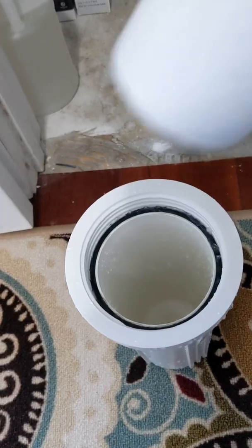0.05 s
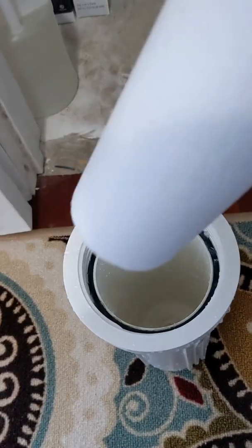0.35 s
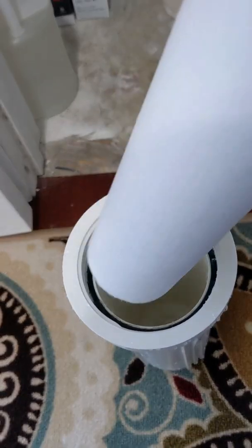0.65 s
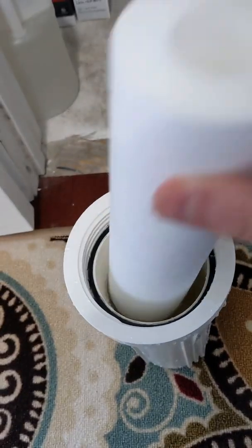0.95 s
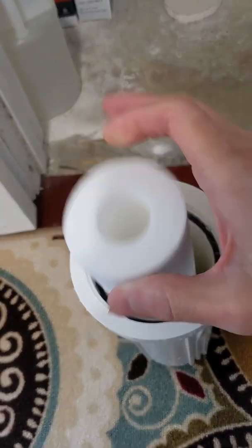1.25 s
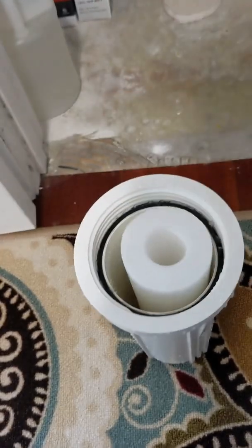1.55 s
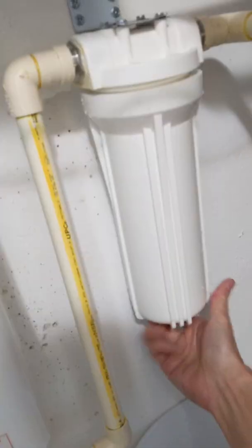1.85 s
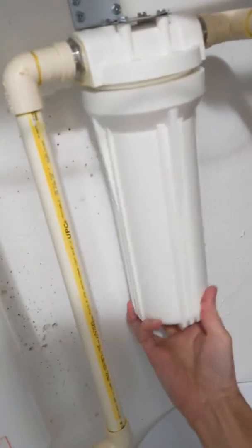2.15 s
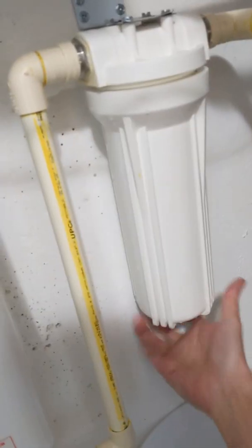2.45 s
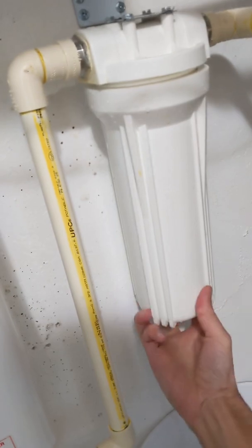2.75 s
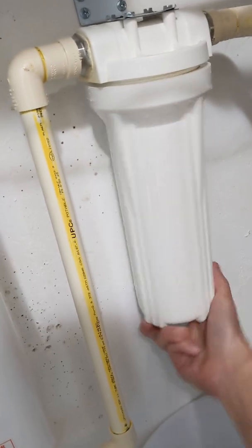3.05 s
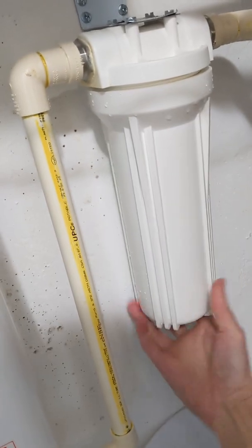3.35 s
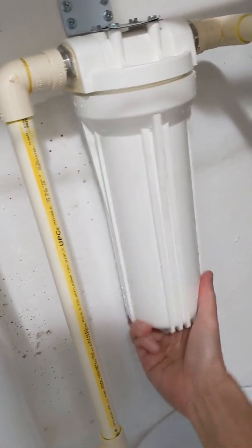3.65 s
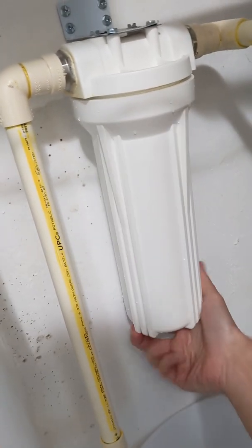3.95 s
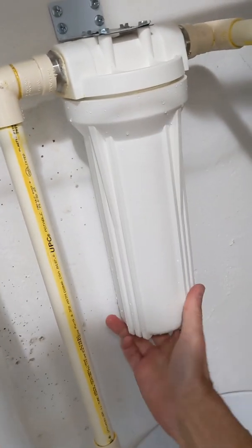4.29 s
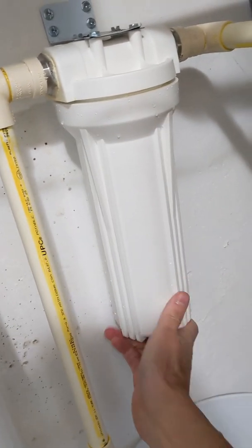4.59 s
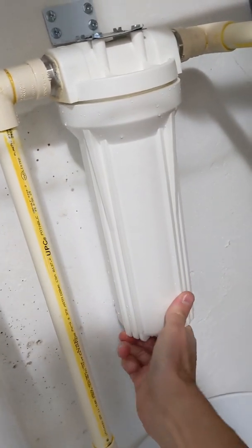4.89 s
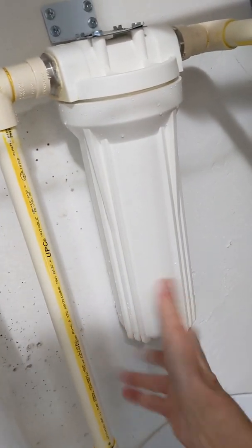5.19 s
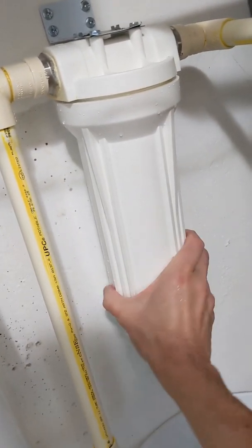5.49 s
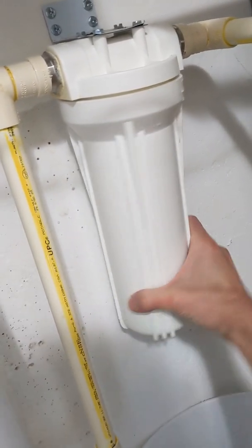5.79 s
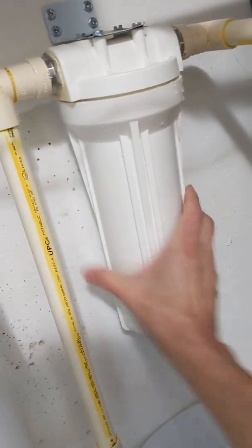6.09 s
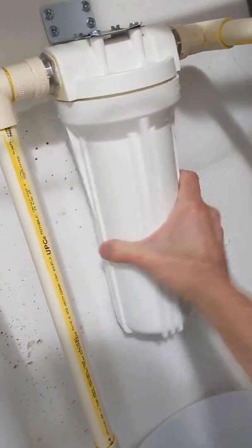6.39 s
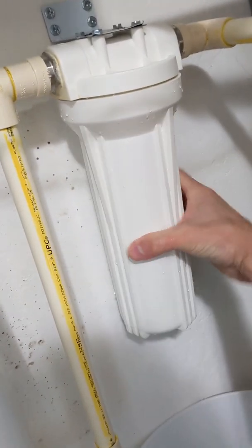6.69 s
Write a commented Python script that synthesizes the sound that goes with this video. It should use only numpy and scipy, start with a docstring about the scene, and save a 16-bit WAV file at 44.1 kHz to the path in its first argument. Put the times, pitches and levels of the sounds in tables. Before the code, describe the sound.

A loud, bouncing hollow thud, then uneven plastic knocks, dull pipe thumps and thread scraping as a filter housing is hand-tightened indoors.

```python
"""A plastic filter housing is screwed onto its head by hand in a small, hard-walled room. Its loose sump
knocks in the threads, ringing the shell and shaking the pipework; the threads scrape and squeak, and
the palm slides to a new grip. In a short scene before it, the cartridge grazes the rim, drops in and
bounces on the bottom with a loud, hollow boom. Mains hum lies under both scenes."""
import sys
import numpy as np
from scipy import signal
from scipy.fft import rfft, irfft, next_fast_len
from scipy.io import wavfile
from scipy.ndimage import uniform_filter1d

SR = 44100
rng = np.random.default_rng(int(sys.argv[2]) if len(sys.argv) > 2 else 0)


def to_wav(sig):
    """Store sig (one row per channel, or 1-D mono) as 16-bit WAV at the path in sys.argv[1].

    Samples outside -1..1 are clipped; the rate is SR.
    """
    pcm = np.clip(np.atleast_2d(sig), -1, 1) * 32767
    pcm = np.round(pcm).astype(np.int16)
    wavfile.write(sys.argv[1], SR, pcm.T)  # frames by channels


N = 296779
TIME = np.arange(N) / SR
RING_TIME = np.arange(SR) / SR  # one second for a hit to ring out
TOP_HZ = 16050
GRIP_S, LET_GO_S = 0.017, 0.022  # attack and release of a twist

# twists of the wrist: start/s, peak/s, end/s, effort slope/(dB/s), scrape/dB, hiss/dB, rumble/dB
TWISTS = [(1.783, 1.798, 1.926, 220.5, -39.5, -63, -42), (2.111, 2.243, 2.434, 127.5, -36, -56, -34),
          (2.792, 2.85, 2.96, 129.5, -47.5, -69, -43), (2.903, 3.053, 3.067, 63, -38.5, -53.5, -35),
          (3.524, 3.768, 3.89, 54.5, -37, -59.5, -20.5), (5.546, 5.743, 5.84, 4, -50.5, -79, -53),
          (6.353, 6.393, 6.62, 14.5, -44, -75, -24.5)]


def amp(db):
    """Decibels to gain."""
    return 10 ** (np.asarray(db) / 20)


def unit(x):
    """Scale to rms 1."""
    return x / np.sqrt(np.mean(x ** 2))


def unit_attack(x):
    """Scale a hit so that its first 30 ms have rms 1."""
    return x / np.sqrt(np.mean(x[..., :int(.03 * SR)] ** 2))


def curve(points, hz):
    """Value of an (f/Hz, value) table on a log-frequency axis."""
    f, value = np.transpose(points)
    return np.interp(np.log(hz + 1), np.log(f), value)


def eq(x, gain):
    """Filter by a gain that is a function of frequency."""
    size = next_fast_len(x.shape[-1] + SR // 8)
    return irfft(rfft(x, size) * gain(np.fft.rfftfreq(size, 1 / SR)), size)[..., :x.shape[-1]]


def colour(x, points):
    """Apply an (f/Hz, level/dB) EQ curve and scale to rms 1."""
    return unit(eq(x, lambda f: amp(curve(points, f))))


def cut(x, hz, kind):
    """Second-order low-pass or high-pass."""
    return signal.sosfilt(signal.butter(2, min(hz, TOP_HZ), kind, fs=SR, output="sos"), x)


def resonate(x, hz, q):
    """One resonant band, with Q held at 1 or more."""
    return signal.lfilter(*signal.iirpeak(min(hz, 15000), max(q, 1), SR), x)


def spread(pair, split_hz=850):
    """Two unrelated signals become one stereo field: centred bass, wide treble."""
    side = eq(pair[1], lambda f: f / np.hypot(f, split_hz))
    return np.array([pair[0] + side, pair[0] - side]) / np.sqrt(2)


def noise(size):
    """Diffuse stereo noise."""
    return spread(rng.standard_normal((2, size)))


def decay(t60):
    """Envelope that falls 60 dB in t60 seconds."""
    return np.exp(-np.log(1000) * RING_TIME / t60)


def ring(modes, scatter_db=0, detune=0, stagger=np.pi):
    """Damped modes, staggered in phase; scatter and detune stand for where the blow lands."""
    out = 0
    for k, (hz, db, t60) in enumerate(modes):
        level_draw, pitch_draw = rng.standard_normal(2)
        phase = 2 * np.pi * hz * (1 + detune * pitch_draw) * RING_TIME - k * stagger
        out = out + amp(db + scatter_db * level_draw) * decay(t60) * np.sin(phase)
    return out


def burst(spectrum, t60, top_hz):
    """Crowded modes of a struck wall: decaying noise, dulled above top_hz by the contact."""
    return unit_attack(cut(colour(noise(SR), spectrum) * decay(t60), top_hz, "low"))


def friction(spectrum, grain_db, patchy_db, catches_hz=90):
    """Dense micro-slips of uneven size that bunch up as the surfaces catch."""
    slips = rng.standard_normal((2, N)) * amp(grain_db * rng.standard_normal(N))
    catching = unit(eq(rng.standard_normal(N), lambda f: np.exp(-(f / catches_hz) ** 2)))
    return colour(spread(slips * amp(patchy_db * catching)), spectrum)


def add(out, t, sound):
    """Mix a sound in at t seconds."""
    i = int(t * SR)
    out[:, i:i + sound.shape[-1]] += sound[..., :N - i]


def swells(rows):
    """Smooth rises and falls of gain from rows of centre/s, length/s, level/dB."""
    gain = np.zeros((1, N))
    for t, length, db in rows:
        add(gain, t - length / 2, amp(db) * np.hanning(int(length * SR)))
    return gain


def effort(twist, release_s):
    """Effort of one twist, 0-1: it grips, builds to its peak, eases at the same rate and lets go."""
    start, peak, end, slope_db_per_s = twist[:4]
    grip = np.clip((TIME - start) / GRIP_S, 0, 1)
    release = np.exp(-np.maximum(TIME - end, 0) / release_s)
    return grip * release * amp(-slope_db_per_s * abs(np.minimum(TIME, end) - peak))


def room(x, wet_db, build_s=0.0045):
    """Add the tail of a small hard room; each octave dies at its own rate."""
    # reverb time: f/Hz, t60/s
    reverb_times = [(80, 0.87), (250, 0.48), (600, 0.45), (1500, 0.25), (4000, 0.39), (12000, 0.25)]
    field, tail = noise(SR), 0
    for hz in 62.5 * 2. ** np.arange(9):
        octave = eq(field, lambda f: np.maximum(1 - abs(np.log2((f + 1) / hz)), 0))
        tail = tail + octave * decay(curve(reverb_times, hz))
    tail = tail * (1 - np.exp(-(RING_TIME / build_s) ** 2))
    return x + amp(wet_db) * signal.fftconvolve(x, unit(tail) / np.sqrt(SR), axes=1)[:, :N]


def room_tone(scene_cut_s=1.79, hum_lift_db=7.5, air_db=-68):
    """Still room air and mains hum, which steps up at the cut to the second scene."""
    # hum tones before the lift: f/Hz, level/dB
    hum_tones = [(60, -50.5), (172.3, -69), (258.4, -75.5)]
    # colour of the air: f/Hz, level/dB
    air_eq = [(25, -26.5), (45, -7), (60, -1.5), (85, -9.5), (120, -20), (185, -9), (400, -23), (700, -27),
              (1600, -36), (7000, -44.5), (16000, -52.5)]
    hum = sum(amp(db) * np.sin(2 * np.pi * (hz * TIME + rng.random())) for hz, db in hum_tones)
    air = colour(noise(N), air_eq)
    above_hum = eq(air, lambda f: f > 300)  # air_db sets the level of this band
    return hum * amp(hum_lift_db * (TIME > scene_cut_s)) + amp(air_db) * air / np.std(above_hum)


def pipe_rumble(settle_s=0.098):
    """The pipework rumbles as the hand twists or leans on it, and sways on after each twist."""
    # the hand leans on the pipework: centre/s, length/s, level/dB
    leans = [(1.89, 0.24, -34), (2.6, 0.31, -47), (2.95, .2, -39), (3.41, 0.19, -37.5), (4.15, 0.089, -43),
             (5.11, 0.13, -34.5), (5.96, 0.16, -38), (6.25, .2, -45)]
    # colour of the rumble: f/Hz, level/dB
    rumble_eq = [(25, -27.5), (40, -10.5), (58, -7.5), (86, 7.5), (115, -9.5), (150, -12.5), (220, -16.5),
                 (420, -17), (600, -46), (1200, -38.5), (4000, -69)]
    twisting = sum(amp(twist[-1]) * effort(twist, settle_s) for twist in TWISTS)
    return (twisting + swells(leans)) * colour(noise(N), rumble_eq)


def rubs():
    """Sliding skin and cartridge fibre swell into soft hiss; seal and palm drag in narrow bands."""
    # slides over plastic: centre/s, length/s, level/dB
    slides = [(1.0, 0.38, -62), (1.313, 0.039, -59.5), (1.976, 0.092, -41.5), (2.342, 0.071, -45),
              (2.559, 0.11, -47), (3.107, 0.077, -40), (3.286, 0.11, -48), (3.399, 0.072, -50.5),
              (3.48, 0.18, -59), (4.092, 0.11, -50.5), (4.599, 0.069, -58), (4.96, 0.2, -64.5),
              (5.17, 0.27, -59.5), (5.447, 0.54, -64.5), (5.987, 0.18, -60), (6.298, 0.18, -58)]
    # colour of a slide: f/Hz, level/dB
    skin_eq = [(200, 9.5), (400, 12), (800, 3.5), (1300, -1), (2300, 2), (3200, -5.5), (4500, -4),
               (7000, -6), (10000, -11), (16000, -17.5)]
    # seal and palm drags: centre/s, length/s, level/dB, f/Hz, Q
    drags = [(3.94, 0.75, -59, 1900, 2.8), (4.403, 0.22, -67.5, 1797, 3.4), (5.73, 0.24, -65, 2290, 7),
             (6.303, 0.064, -50, 2180, 1.8), (6.374, 0.016, -34, 2300, 14), (6.548, 0.23, -50, 2180, 10)]
    skin = swells(slides) * friction(skin_eq, grain_db=2.5, patchy_db=2.0)
    seal = 0
    for t, length, db, hz, q in drags:
        band = unit(resonate(resonate(noise(N), hz, q), hz, q))
        seal = seal + swells([(t, length, db)]) * band
    return room(skin + seal, wet_db=-14.0)


def ticks():
    """Rim, ribs and fingernails make tiny hard contacts: a short ping and a bright snap."""
    # contacts: t/s, ping/dB, ping f/Hz, snap/dB
    contacts = [(0.901, -51, 1290, -43.5), (0.944, -67, 2680, -59), (1.3683, -57.5, 6100, -45),
                (1.905, -66, 1085, -60), (1.9332, -56.5, 1950, -67), (2.237, -50, 4300, -58),
                (2.499, -53.5, 1670, -63.5), (2.932, -47.5, 1750, -57.5), (3.3772, -79, 892, -55.5),
                (4.4025, -69.5, 13000, -88.5), (5.057, -59, 977, -96), (6.098, -52, 2170, -66),
                (6.1849, -67, 1210, -61), (6.2865, -50.5, 1200, -65)]
    # colour of the snap: f/Hz, level/dB
    snap_eq = [(200, 0.5), (700, -5.5), (1400, -4), (3000, -7), (6000, -1), (9000, -14.5), (16000, -21)]
    out = np.zeros((2, N))
    for t, ping_db, hz, snap_db in contacts:
        snap = colour(noise(SR), snap_eq) * decay(0.037)
        ping = resonate(snap, hz, q=4)
        add(out, t, amp(ping_db) * unit_attack(ping) + amp(snap_db) * unit_attack(snap))
    return room(out, wet_db=-14.0)


def squeaks(rate_rise=0.06, rate_wobble=0.012, rub_db=1):
    """Stick-slip quickens and swells over a rough rub as the grip tightens; each slip rings the wall."""
    # squeaks: start/s, end/s, slip rate/Hz, level/dB, ring f/Hz, Q, relative overtone/dB
    cues = [(2.164, 2.228, 436, -36, 1930, 4.1, -30), (5.501, 5.588, 296, -34, 1250, 0.52, -7)]
    out = np.zeros((2, N))
    for start, end, slip_hz, db, ring_hz, q, overtone_db in cues:
        size = int((end - start) * SR)
        progress = np.linspace(0, 1, size)
        wobble = unit(uniform_filter1d(rng.standard_normal(size), size=120))
        rate = slip_hz * (1 + rate_rise * (progress - .5) + rate_wobble * wobble)
        pulses = np.diff(np.floor(np.cumsum(rate) / SR), prepend=0)
        slips = pulses * amp(3 * rng.standard_normal(size))
        wall = unit(signal.fftconvolve(slips[None], noise(SR) * decay(0.0068), axes=1)[:, :size])
        wall = wall + amp(rub_db) * noise(size)
        body = unit(cut(resonate(resonate(wall, ring_hz, q), ring_hz, q), 3900, "low"))
        overtone = amp(overtone_db) * unit(resonate(resonate(wall, 3400, q=2.4), 2950, q=4.2))
        add(out, start, amp(db) * (body + overtone) * np.sin(np.pi * progress ** 2))
    return room(out, wet_db=-10.5)


def threads():
    """The threads scrape with the effort of each twist; fast sliding adds a fine hiss."""
    # colours of the scrape and the hiss: f/Hz, level/dB
    scrape_eq = [(350, 2), (600, -5), (800, -4.5), (1100, -7.5), (1500, -6.5), (1850, -5.5), (2350, -2),
                 (2900, -12.5), (4300, -13), (6500, -19), (10000, -31), (16000, -47)]
    hiss_eq = [(2000, -35.0), (5000, 0.5), (8000, 5.5), (16000, -4.5)]
    scrape_gain, hiss_gain = 0, 0
    for twist in TWISTS:
        scrape_db, hiss_db, _ = twist[4:]
        push = effort(twist, LET_GO_S)
        scrape_gain = scrape_gain + amp(scrape_db) * push
        hiss_gain = hiss_gain + amp(hiss_db) * push ** 1.65  # hiss grows faster than the effort
    scrape = scrape_gain * friction(scrape_eq, grain_db=3.5, patchy_db=2.5)
    hiss = hiss_gain * friction(hiss_eq, grain_db=7.5, patchy_db=4)
    return room(scrape + hiss, wet_db=-11.5)


def cartridge_drop():
    """The cartridge hits the bottom and bounces: a hollow boom, and a clack when the contact is hard."""
    # landings: t/s, level/dB, relative clack/dB, contact cut-off/Hz
    landings = [(1.433, -3, 1, 4174), (1.492, -10, -22, 1994), (1.5659, -7, 0, 1680),
                (1.603, -13.5, -13.5, 1510)]
    # modes of the housing standing on a rug: f/Hz, level/dB, t60/s
    housing_modes = [(212, 3, 0.054), (240.7, -10.5, 0.19), (288, -29.5, 0.6), (350, -6.5, 0.031),
                     (450, -18.5, 0.048), (550, -22.5, 0.078)]
    # modes of its bottom plate: f/Hz, level/dB, t60/s
    plate_modes = [(880, -8.5, .024), (1240, -6, .024), (2650, -12, .007), (3100, -23, .025),
                   (3400, -24, .03)]
    # noisy edge of the clack: f/Hz, level/dB
    edge_eq = [(300, -12), (900, -2), (1400, -4), (1800, -5), (2600, -6.5), (3400, -3), (4200, -7),
               (5200, -13.5), (7000, -11.5), (16000, -26.5)]
    out = np.zeros((2, N))
    for t, db, clack_db, contact_hz in landings:
        boom = cut(ring(housing_modes), 110, "high")
        clack = cut(ring(plate_modes), contact_hz, "low")
        edge = burst(edge_eq, t60=0.09, top_hz=1.09 * contact_hz)
        add(out, t, amp(db) * (boom + amp(clack_db) * (clack + amp(-30.5) * edge)))
    return room(out, wet_db=-11.5)


def pipe_thump():
    """One dull thump of the heavy pipework; its modes start nearly together."""
    # pipework modes: f/Hz, level/dB, t60/s
    pipe_modes = [(61.6, 0.5, 0.33), (84.2, 0, 0.3), (106.3, 6.5, 0.067), (129.6, -9.5, 0.25)]
    modes = ring(pipe_modes, scatter_db=1, detune=.01, stagger=np.pi / 4)
    muffled = cut(cut(modes, 230, "low"), 230, "low")
    return unit_attack(eq(muffled, lambda f: 1 - np.exp(-(f / 55) ** 4)))  # trim the sub-bass


def shell_hit():
    """One blow on the hanging sump rings its main modes and flexes its wall."""
    # main modes: f/Hz, level/dB, t60/s
    shell_modes = [(195.5, -4.5, 0.15), (233.6, -3, 0.25), (275.4, -0.5, 0.12), (353.8, -2, 0.16),
                   (418.2, -2, 0.18), (504.8, -8, 0.18), (639.4, -13.5, 0.13), (740, -17.5, 0.14)]
    # crowded wall modes: f/Hz, level/dB
    flex_eq = [(120, -5), (200, 3), (310, 5.5), (440, -5.5), (540, -2.5), (620, -24.5), (800, -13),
               (1100, -26), (3000, -74)]
    flex = cut(burst(flex_eq, t60=.12, top_hz=750), 140, "high")
    body = cut(unit_attack(ring(shell_modes, detune=0.022)), 900, "low")
    return body + amp(1.0) * flex


def sump_knocks(snap_slack_db=-41, snap_loaded_db=-12.5, rebound_s=0.018, rebound_db=-4):
    """Each knock rings the shell, thumps the pipework and cracks at the thread; load adds snap."""
    # the sump knocks in its threads: t/s, shell/dB, thump/dB, crack/dB
    hits = [(1.795, -31.5, -34, -63), (1.81, -31, -32.5, -56), (2.238, -27.5, -23.5, -58),
            (2.262, -25, -23, -32.5), (2.833, -30, -34.5, -42), (3.043, -21.5, -22.5, -23),
            (3.052, -21.5, -14.5, -29), (3.071, -24, -23, -34), (3.093, -40, -31, -34.5),
            (3.258, -38.5, -42, -57), (3.311, -42, -41, -47.5), (3.504, -42, -41, -63),
            (3.537, -34.5, -46, -46.5), (3.609, -35.5, -25.5, -62), (3.664, -33, -21.5, -44),
            (3.723, -23.5, -19.5, -35), (3.752, -21, -13.5, -34.5), (3.828, -31, -22.5, -42),
            (4.015, -36.5, -26, -56), (4.223, -39, -33.5, -59.5), (4.577, -48.5, -34, -72),
            (5.157, -22.5, -20.5, -33), (5.572, -38.5, -36.5, -36.5), (5.834, -43, -28, -45),
            (5.874, -44.5, -30, -47.5), (6.215, -58.5, -52.5, -62), (6.364, -44, -41, -32.5),
            (6.391, -29, -22.5, -38.5), (6.408, -23, -20, -37), (6.458, -29.5, -36, -43),
            (6.616, -34, -26, -42)]
    # crack of plastic on plastic: f/Hz, level/dB
    crack_eq = [(150, -21.5), (450, -6), (700, 8), (1100, -2), (1500, -1), (1900, -0.5), (2400, -4),
                (2900, -10.5), (4000, -17.5), (16000, -44)]
    # treble snap on top of it: f/Hz, level/dB
    snap_eq = [(1500, -18), (3000, 1), (4400, 5.5), (6500, 0), (10000, -14), (16000, -15)]
    hard_crack_hz, hard_crack_db = 2870, -29
    shells, cracks, thumps = np.zeros((3, 2, N))
    load = np.max([effort(twist, LET_GO_S) for twist in TWISTS], axis=0)
    for t, shell_db, thump_db, crack_db in hits:
        force = load[int(t * SR)]
        cutoff_hz = hard_crack_hz * amp(crack_db - hard_crack_db) ** 0.19  # softer blows are duller
        crack = burst(crack_eq, t60=0.073, top_hz=cutoff_hz)
        snap_gain = amp(snap_slack_db) + amp(snap_loaded_db) * force ** 2
        snap = snap_gain * burst(snap_eq, t60=.11, top_hz=11940)
        add(shells, t, amp(shell_db) * shell_hit())
        add(cracks, t, amp(crack_db) * (crack + snap))
        add(thumps, t, amp(thump_db) * pipe_thump())
        if force > .5:  # the shell rocks back and strikes again
            add(shells, t + rebound_s, force * amp(shell_db + rebound_db) * shell_hit())
    return room(shells, wet_db=-5.5) + room(cracks, wet_db=-8.5) + room(thumps, wet_db=-6.5)


def scene():
    """Impacts and friction over the bed of rumble and room tone."""
    impacts = cartridge_drop() + sump_knocks() + ticks()
    return impacts + threads() + rubs() + squeaks() + pipe_rumble() + room_tone()


def record(dry):
    """The two microphone ports colour the sound differently; deep bass and the top are cut."""
    # port balance: f/Hz, left minus right/dB
    balance = [(60, 1), (110, -1), (200, 1.5), (380, -0.5), (700, -2), (1290, 3), (2380, 2), (4400, 2.5),
               (8120, -1.5), (15000, -6.5)]
    left = eq(dry[0], lambda f: amp(curve(balance, f) / 2))
    right = eq(dry[1], lambda f: amp(-curve(balance, f) / 2))
    steep_lowpass = signal.ellip(10, .2, 80, TOP_HZ, fs=SR, output="sos")
    return signal.sosfilt(steep_lowpass, cut(np.array([left, right]), 42, "high"))


dry = scene()
out = record(dry)
to_wav(out)
```